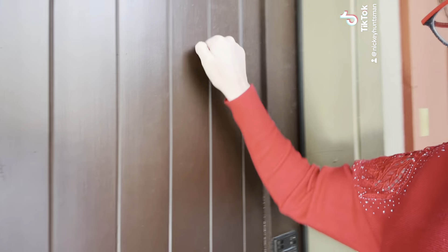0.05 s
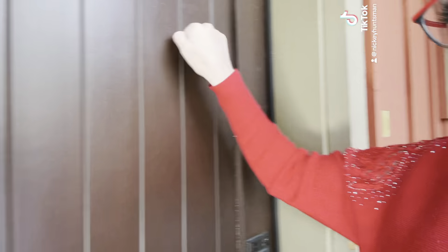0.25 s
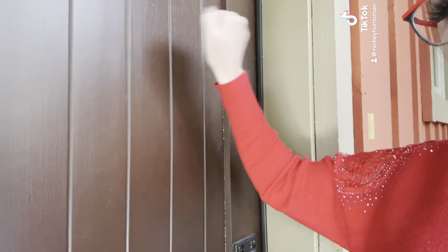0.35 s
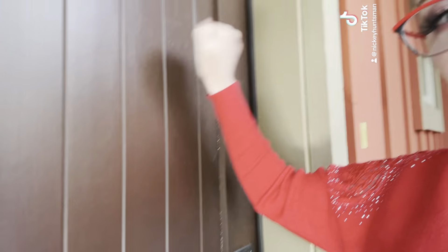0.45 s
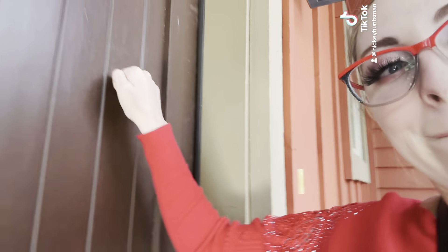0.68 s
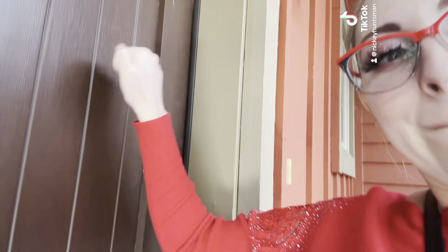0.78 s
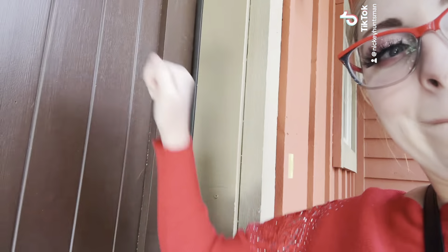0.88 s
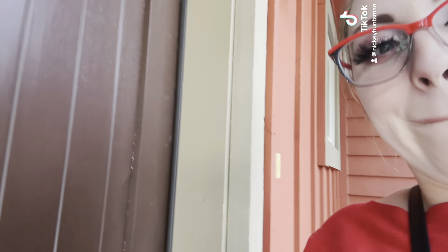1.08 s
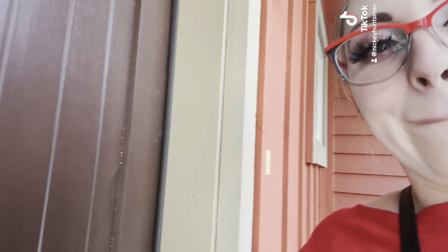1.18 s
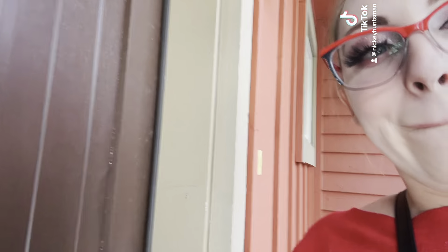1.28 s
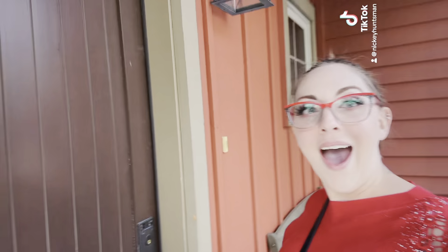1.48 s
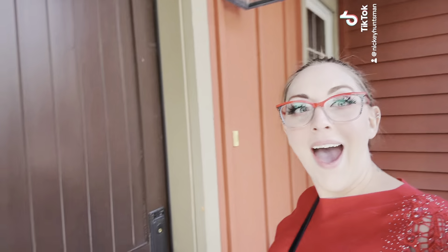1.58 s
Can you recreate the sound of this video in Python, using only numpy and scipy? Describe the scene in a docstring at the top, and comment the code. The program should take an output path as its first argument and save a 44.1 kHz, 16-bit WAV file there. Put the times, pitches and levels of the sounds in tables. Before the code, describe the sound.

Knuckles knock on a heavy wooden front door, two sharp raps after a fading first one

```python
"""On a porch, knuckles rap a heavy wooden front door, a hand-held phone close by. The first of three blows
falls just before the start. Short pushes ring the door's decaying partials; noise makes slap, crack, treble
wash and dense ring, and the door rebounds in its frame. Grainy noise is sleeve rustle and a handling tick,
leaking pressure steps are taps on the phone, shaped noise is hum and air. The phone delays bass behind treble;
near the end the sound drops out, and the air returns thinner."""
import sys
import numpy as np
from scipy import signal
from scipy.fft import rfft, irfft
from scipy.io import wavfile
from scipy.ndimage import uniform_filter1d

SR = 44100
rng = np.random.default_rng(int(sys.argv[2]) if len(sys.argv) > 2 else 0)


def master(y):
    """Save y as 16-bit WAV."""
    cut = np.clip(np.atleast_2d(y).T, -1, 1)
    pcm = np.round(cut * 32767)  # scale
    wavfile.write(sys.argv[1], SR, pcm.astype(np.int16))


N = 72765

# The blows. Each row: start in seconds, overall level in dB, then relative to it boom in dB and
# dense ring in dB, slap centre in Hz, slap in dB, crack in dB.
BLOWS = [(-.045, -30, 2, 0, 1500, -12, -40), (.2135, -18.5, 1.5, 2.5, 1460, 11, -16),
         (0.4766, -16, -7.5, 3, 2086, 5.5, -49.5)]
# Contacts within each blow, the last being the door rebounding against its stop.
# Each row: delay in ms, level in dB, contact length in ms.
CONTACTS = [
    [(0, 4, 1), (15.5, -7, 0.91)],
    [(0, -8, 0.13), (1.8, 1, 0.42), (5.5, -0.5, .7), (16, -3, 0.7)],
    [(0, -0.5, 0.39), (2.2, 5.5, 0.51), (5.1, -7, .6), (15.5, -7, 0.57)],
]
# Whole door swinging on hinges and latch. Each row: frequency in Hz, level in dB, t60 in seconds.
DOOR_BOOM = [(42.12, -10, 0.94), (50.4, -15, 0.35), (70, -3, .35), (101.3, 4.5, .2), (125, 5, 0.17),
             (133, -10, 0.48), (172, -5, .2), (221, -9, 0.3)]
# Modes of the door panel. Each row: frequency in Hz, t60 in seconds, level in dB when struck at the
# first spot, level in dB at the second.
PANEL_MODES = [(296.3, .3, -12, -21.5), (353.5, 0.26, -1.5, -9.5), (364.4, 0.19, -3, -4.5),
               (414.2, .3, -8, -10.5), (467.6, 0.21, -9.5, -10.5), (697, .16, -9.5, -12.5),
               (734.7, .15, -18, -9), (818.5, 0.11, -21, -12.5), (928, 0.098, -18, -7),
               (942, 0.17, -13, -6), (1035, 0.13, -10.5, -6), (1148, 0.16, -5, -12), (1227, 0.18, -6.5, -1),
               (1305, 0.17, -8.5, -8), (1475, .18, -1.5, -15), (1535, 0.13, -2.5, -13),
               (1565, .12, -11, -9.5), (2017, 0.031, -13.5, -7.5), (2338, .09, -6.5, -10.5),
               (2800, 0.12, -20.5, -15)]
# Dense ring of wood and porch. Each row: band centre in Hz, width in Hz, level in dB, t60 in seconds.
DENSE_RING = [(147, 220, -21, 0.48), (356, 290, -19, .45), (790, 350, -22, 0.34), (1060, 230, -22.5, .35),
              (1315, 450, -17.5, 0.33), (1990, 830, -25, .25), (2620, 700, -32.5, 0.33),
              (4000, 4800, -43.5, .25), (15000, 6000, -60.5, 0.45)]
# Fingers shifting on the phone. Each row: start in seconds, level in dB, rise in ms, release in ms.
PHONE_TAPS = [(0.961, -34, 0.27, 4.), (.9905, -41, 1.1, 1.5), (1.5555, -18, 2.93, 7.3)]
# Sleeve rustle, and at 1.5565 s a tick of the hand on the phone. Each row: middle in seconds, # length in
# seconds, level in dB before its swell, centre in Hz, width in Hz.
RUSTLES = [(0.2, 0.054, -66.5, 2540, 900), (.19, 0.091, -72, 4400, 1500),
           (.44, 0.074, -68, 2748, 270), (0.29, 0.023, -67.5, 8200, 4000),
           (1.5565, 0.0065, -61, 6650, 4000), (1.15, .02, -81, 4200, 1900),
           (1.109, 0.019, -73, 4950, 2480), (1.242, 0.18, -69.5, 3480, 5940),
           (1.255, .03, -63.5, 8500, 5000)]
# Tone of the outdoor air. Each row: frequency in Hz, relative density in dB per Hz.
AIR_TONE = [(18, -29), (30, 6), (86, -10.5), (461, -11.5), (600, -17), (822, -16), (2230, -22),
            (6050, -29.5), (16000, -45.5)]
# One value for each blow: struck spot as a panel level column, counted from 0.
STRUCK_SPOTS = (0, 0, 1)
# One value for each blow: slap width as a share of the slap centre.
SLAP_SHARES = (.7, 0.68, 0.8)

WASH_DB, WASH_T60_S = (-38.5, -46, -60), 0.28  # treble wash after each blow's crack
SLAP_T60_S = .035
CRACK_HZ, CRACK_T60_S = 9000, 0.012
THUD_DB, THUD_RISE_MS, THUD_RELEASE_MS = 4, 1.2, 3.  # the blow's boom level is added to this level
TAP_CUT_HZ = 78  # bass cut of every pressure step
AIR_DB = -65
HUM_HZ, HUM_WIDTH_HZ, HUM_DB = 116.5, 48, -63
SILENT_S = (1.327, 1.488)  # start and end of the drop-out
FADE_S = .004  # just outside the drop-out
AIR_AFTER_DB, BASS_AFTER_HZ, DULL_AFTER_HZ = 5, 323, 8000  # lift and corners after the drop-out
LOW_CUT_HZ, TOP_HZ = 31, 16000
LAG_LOW_HZ, LAG_STEP = 62.8, 1.37  # lowest phase-lag corner, ratio between corners
HEADROOM = .7  # full-scale amplitude that rounded peaks approach
PRE = SR // 10  # samples of lead-in, holding the onset of the first blow


def undb(db):
    """Turn dB into an amplitude factor."""
    return 10 ** (np.asarray(db) / 20)


def band(n, hz, width_hz):
    """Noise resonating around a centre, at unit rms."""
    f = np.fft.rfftfreq(n, 1 / SR)
    detune = (f * f - hz * hz) / (f * width_hz + 1)
    x = irfft(rfft(rng.standard_normal(n)) / (1 + detune ** 2), n)
    return x / x.std()


def fall(t, t60):
    """Exponential decay by 60 dB in t60 seconds."""
    return np.exp(-np.log(1000) * t / t60)


def push(ms):
    """Smooth contact force of unit area."""
    progress = np.clip(np.arange(200) / SR * 1000 / ms, 0, 1)
    force = np.sin(np.pi * progress) ** 2
    return force / force.sum()


def add(out, x, start_s):
    """Mix a sound in at its start time, cutting what runs past the end."""
    i = int(start_s * SR) + PRE
    out[i:i + len(x)] += x[:len(out) - i]


def modes(table, t):
    """Sum of decaying sine partials, one for each mode."""
    return sum(undb(db) * fall(t, t60) * np.sin(2 * np.pi * hz * t) for hz, db, t60 in table)


def pressure_step(db, rise_ms, release_ms):
    """A pressure step that leaks away, for the thud of a blow or a finger tap on the phone."""
    t_ms = np.arange(SR // 10) / SR * 1000
    force = np.pad(push(rise_ms), (0, len(t_ms)))
    step = np.cumsum(force)[:len(t_ms)]
    x = undb(db) * step * np.exp(-t_ms / release_ms)
    return signal.lfilter(*signal.butter(2, TAP_CUT_HZ, "high", fs=SR), x)


def dense_ring(t, ring_db):
    """Crowded resonances of wood and porch, as decaying noise bands that swell in quickly."""
    ring = sum(undb(db + ring_db) * fall(t, t60) * band(len(t), hz, width_hz)
               for hz, width_hz, db, t60 in DENSE_RING)
    return ring * (1 - np.exp(-t / .002))


def knock(spot, contacts, slap_share, wash_db, db, boom_db, ring_db, slap_hz, slap_db, crack_db):
    """Each contact pushes the door modes and slaps; the first two crack, the first starts ring and wash."""
    t = np.arange(SR) / SR
    panel = modes([(hz, spot_db[spot], t60) for hz, t60, *spot_db in PANEL_MODES], t)
    body = .5 * (undb(boom_db) * modes(DOOR_BOOM, t) + panel)
    out = dense_ring(t, ring_db)
    out += undb(wash_db) * band(SR, CRACK_HZ, 14000) * fall(t, WASH_T60_S)
    for lag_ms, contact_db, ms in contacts:
        k = int(lag_ms * SR / 1000)
        slap = undb(slap_db) * fall(t, SLAP_T60_S) * band(SR, slap_hz, slap_hz * slap_share)
        struck = np.convolve(body + slap, push(ms))
        out[k:] += undb(contact_db) * struck[:SR - k]
    for lag_ms, *_ in contacts[:2]:
        k = int(lag_ms * SR / 1000)
        crack = undb(crack_db) * band(SR, CRACK_HZ, 9500) * fall(t, CRACK_T60_S)
        out[k:] += crack[:SR - k]
    # air shoved by the door face
    out[:SR // 10] += pressure_step(THUD_DB + boom_db, THUD_RISE_MS, THUD_RELEASE_MS)
    return undb(db) * out


def air_and_hum(n):
    """Outdoor hush as shaped noise over a wavering hum of narrow noise; thinner after the drop-out."""
    f = np.fft.rfftfreq(n, 1 / SR) + 1
    tone_hz, tone_db = np.array(AIR_TONE).T
    tone = undb(np.interp(np.log(f), np.log(tone_hz), tone_db))
    hush = irfft(rfft(rng.standard_normal(n)) * tone, n)
    hum = undb(HUM_DB) * band(n, HUM_HZ, HUM_WIDTH_HZ)
    full = undb(AIR_DB) * hush / hush.std() + hum
    thin = signal.lfilter(*signal.butter(1, [BASS_AFTER_HZ, DULL_AFTER_HZ], "band", fs=SR), full)
    swap = PRE + SILENT_S[1] * SR - SR // 20  # hidden inside the drop-out
    return np.where(np.arange(n) > swap, undb(AIR_AFTER_DB) * thin, full)


def rustle(length_s, db, hz, width_hz):
    """Cloth rubbing or a hand on the phone: a swell of noise whose level wanders at random, making it grainy."""
    n = int(length_s * SR)
    wander = uniform_filter1d(rng.standard_normal(n), size=100) * 10
    grain = undb(3 * wander)  # about 3 dB of wander
    return undb(db) * np.hanning(n) * grain * band(n, hz, width_hz)


def phone_lag(x):
    """Microphone path: a bass cut, then all-passes that turn a click into a falling chirp."""
    x = signal.sosfilt(signal.butter(4, LOW_CUT_HZ, "high", fs=SR, output="sos"), x)
    for hz in LAG_LOW_HZ * LAG_STEP ** np.arange(13):
        g = np.tan(np.pi * hz / SR)
        a = (g - 1) / (g + 1)
        x = signal.lfilter([a, 1], [1, a], x)
    return x


def scene():
    """Lay blows, phone taps and rustles over the air, all heard through the phone's lag."""
    out = air_and_hum(N + PRE)
    for (start_s, *blow), *strike in zip(BLOWS, STRUCK_SPOTS, CONTACTS, SLAP_SHARES, WASH_DB):
        add(out, knock(*strike, *blow), start_s)
    for middle_s, length_s, *row in RUSTLES:
        add(out, rustle(length_s, *row), middle_s - length_s / 2)
    for start_s, *row in PHONE_TAPS:
        add(out, pressure_step(*row), start_s)
    return phone_lag(out)[None, PRE:]


def record(dry):
    """Peaks are rounded, the sound drops out briefly, and the top is cut steeply."""
    t = np.arange(N) / SR
    outside_s = np.maximum(SILENT_S[0] - t, t - SILENT_S[1])  # time away from the drop-out
    gate = np.clip(outside_s / FADE_S, 0, 1)
    rounded = HEADROOM * np.tanh(dry / HEADROOM)
    top_cut = signal.ellip(10, .2, 80, TOP_HZ, fs=SR, output="sos")
    return signal.sosfilt(top_cut, rounded * gate)


dry = scene()
out = record(dry)
master(out)
```